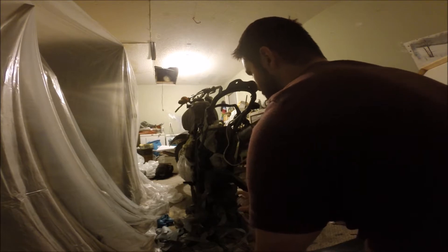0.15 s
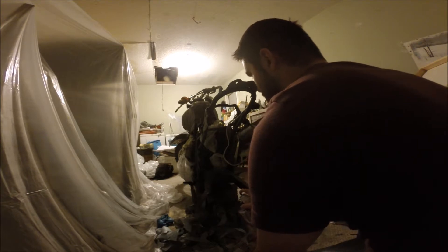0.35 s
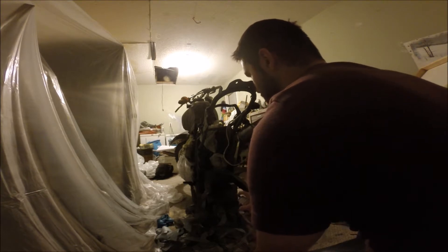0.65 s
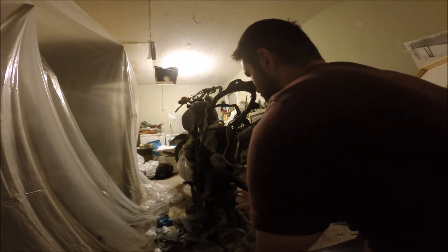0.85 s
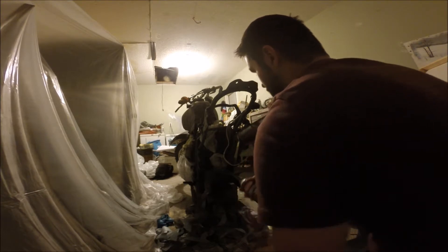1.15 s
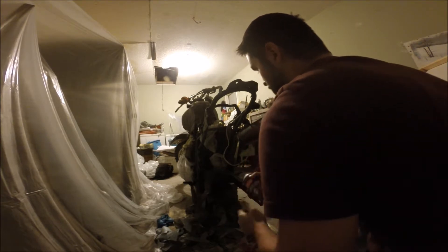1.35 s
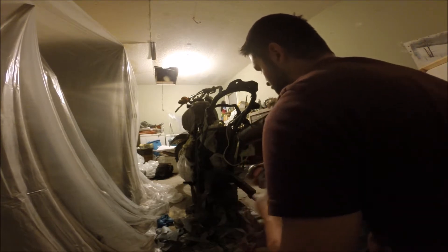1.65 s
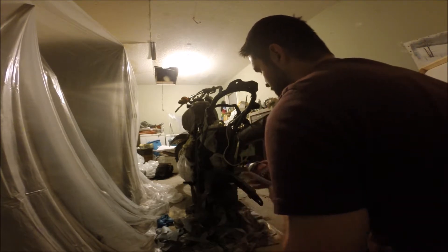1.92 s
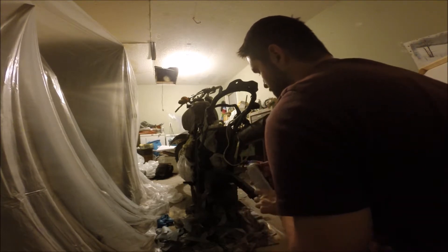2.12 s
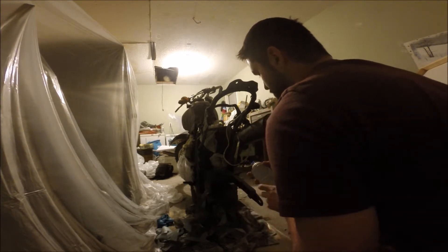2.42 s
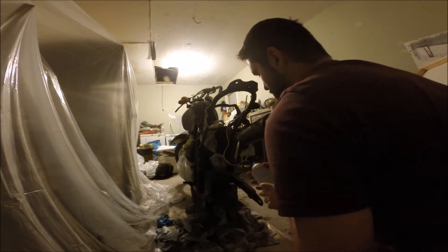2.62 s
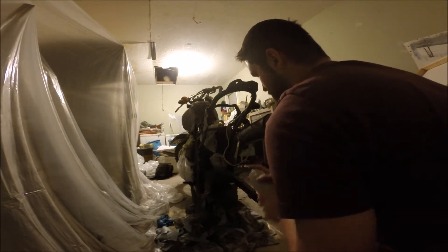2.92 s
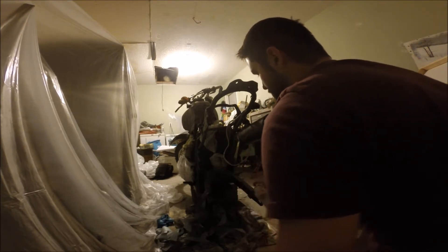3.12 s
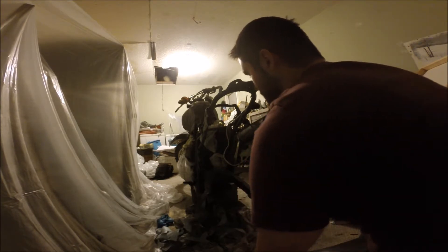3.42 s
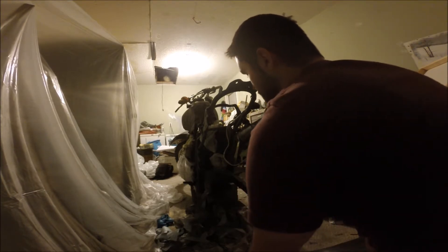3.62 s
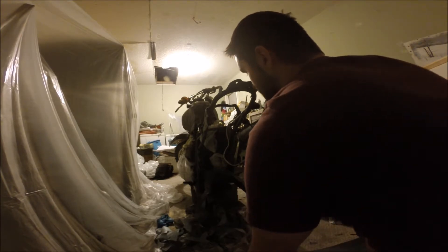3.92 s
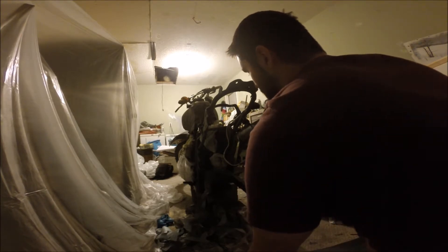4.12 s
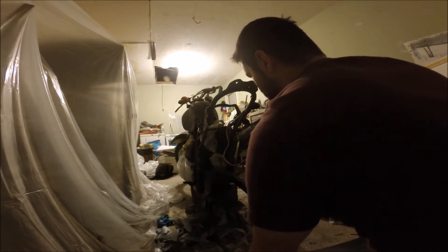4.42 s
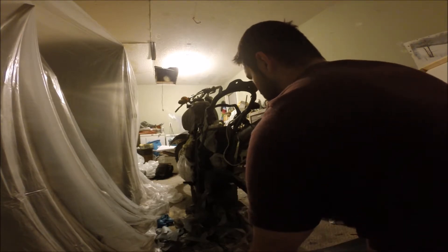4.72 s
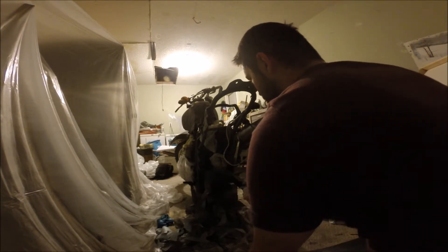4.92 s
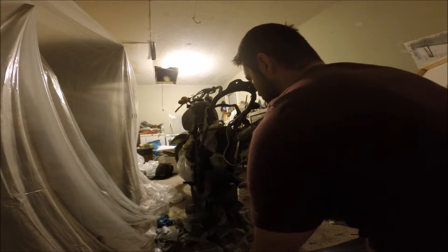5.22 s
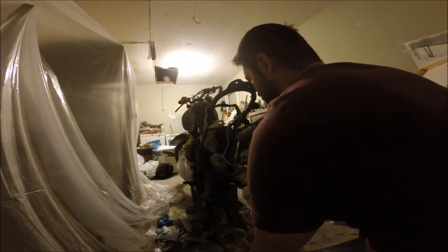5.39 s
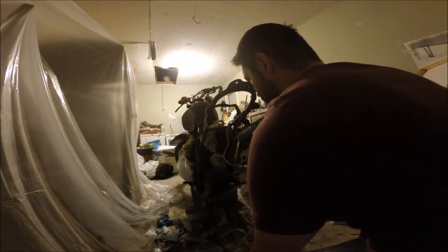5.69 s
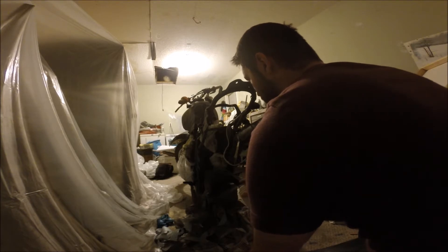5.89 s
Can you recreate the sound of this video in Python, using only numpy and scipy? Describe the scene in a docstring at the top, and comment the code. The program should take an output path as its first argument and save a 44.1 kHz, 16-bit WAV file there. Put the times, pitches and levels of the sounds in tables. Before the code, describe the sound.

Metallic ball rattle inside a shaken aerosol can, first a short burst, then a dense one, before two hissing sprays in a lightly echoing room.

```python
"""In a small workshop with bare walls, a can of spray paint is handled, shaken and sprayed.
Its mixing ball clacks a few times, then rattles hard; each blow is a click and a chatter that ring the can.
One dull bump, a soft push into low resonances, comes early in the shaking. The nozzle gives a short puff
and then a longer spray, both made of shaped noise, and the ball ticks on between them.
The walls echo briefly over a low rumble of noise and a faint mains hum, a plain sine tone."""
import sys
import numpy as np
from scipy import signal
from scipy.fft import rfft, irfft, next_fast_len
from scipy.io import wavfile

SR = 44100
rng = np.random.default_rng(int(sys.argv[2]) if len(sys.argv) > 2 else 0)


def digitize_waveform(pressure):
    """Quantize a signal to 16-bit integers and store it at the path in sys.argv[1].

    Rows of a 2-D input are taken as channels; values are limited to [-1, 1].
    """
    field = np.atleast_2d(pressure).T
    bounded = np.clip(field, -1, 1)
    quanta = np.round(bounded * 32767).astype(np.int16)
    wavfile.write(sys.argv[1], SR, quanta)


N = 266829
TIME = np.arange(N) / SR   # s
ECHO_SIZE = SR // 3   # samples in one echo or one blow
ROOM_EDGES = np.geomspace(100, SR / 2, 15)   # edges of the echo's bands, Hz
MAINS_HZ, FLOOR_DB = 60, -56   # pitch of the hum; level of the room noise
CUTOFF_HZ = 15600


def from_db(db):
    """Turn decibels into a gain."""
    return 10 ** (np.asarray(db) / 20)


def rms_one(x):
    """Scale a sound to an average power of 1."""
    return x / np.sqrt(np.mean(x ** 2) + 1e-20)


def at_hz(points, hz):
    """Read a table between its rows, with frequency on a log scale."""
    known_hz, values = np.transpose(points)
    return np.interp(np.log(np.maximum(hz, 1)), np.log(known_hz), values)


def noise(spectrum):
    """Steady noise: random values shaped by a spectrum, then scaled to rms 1."""
    size = next_fast_len(N)
    hz = np.arange(size // 2 + 1) * SR / size
    white = rfft(rng.standard_normal(size))
    coloured = irfft(white * from_db(at_hz(spectrum, hz)), size)
    return rms_one(coloured[:N])


def resonate(x, hz, width_hz):
    """One resonance: it favours one pitch, with gain 1 at its top, and a narrow one rings longer."""
    r = np.exp(-np.pi * width_hz / SR)
    top = np.array([1, 0, -1]) * (1 - r * r) / 2
    feedback = [1, -2 * r * np.cos(2 * np.pi * hz / SR), r * r]
    return signal.lfilter(top, feedback, x + 1e-18)


def add(track, s, sound):
    """Mix a short sound into a track at time s."""
    start = max(round(s * SR), 0)
    track[start:start + len(sound)] += sound[:N - start]


# Colour of the room's own noise: (frequency [Hz], relative level per Hz [dB])
ROOM_NOISE = [(12, -41), (20, -0.5), (123, -3.5), (255, -7.5), (367, -10), (459, -11), (542, -12),
              (1030, -17), (1370, -18), (1530, -19), (1710, -19), (4060, -25.5), (9140, -36),
              (14300, -45.5), (16000, -74)]


def background(hum_db):
    """The room's rumble and hiss are shaped noise; the faint mains hum is a sine."""
    hum = from_db(hum_db) * np.sin(2 * np.pi * MAINS_HZ * TIME)
    return from_db(FLOOR_DB) * noise(ROOM_NOISE) + hum


# Time the workshop's echo takes to fall by 60 dB: (frequency [Hz], time [s])
ECHO_TIMES = [(250, 0.19), (800, 0.6), (1800, 0.32), (4000, 0.32), (8000, 0.25), (14000, 0.29)]


def room_fades(build_s):
    """Echo loudness over time in each band: a quick build-up, then a decay, slowest near 800 Hz."""
    t = TIME[:ECHO_SIZE]
    band_middles = np.sqrt(ROOM_EDGES[:-1] * ROOM_EDGES[1:])
    t60 = at_hz(ECHO_TIMES, band_middles)
    fades = (1 - np.exp(-t / build_s)) * np.exp(-np.log(1000) * t / t60[:, None])
    return fades / np.linalg.norm(fades, axis=1, keepdims=True)


def echo(room, colour):
    """Many dense reflections act like noise of a given colour (dB for each Hz), fading band by band."""
    hz = np.arange(ECHO_SIZE // 2 + 1) * SR / ECHO_SIZE
    spectrum = rfft(rng.standard_normal(ECHO_SIZE)) * from_db(colour(hz))
    bands = (hz >= ROOM_EDGES[:-1, None]) & (hz < ROOM_EDGES[1:, None])
    return np.sum(irfft(spectrum * bands, ECHO_SIZE) * room, axis=0)


def workshop(x, room, echo_db):
    """The direct sound plus its echo, heard from one fixed spot."""
    return x + signal.fftconvolve(x, echo(room, lambda hz: echo_db))[:N]


def friction(swells, centre_hz, width_hz):
    """Rubbing makes many tiny grains: spiky noise through one broad resonance, in short swells."""
    out = np.zeros(N)
    for s, db, length in swells:
        swell = signal.windows.tukey(round(length * SR))
        grains = rng.standard_normal(len(swell)) ** 3   # cubing makes the noise spiky
        rub = rms_one(resonate(grains, centre_hz, width_hz))
        add(out, s, from_db(db) * swell * rub)
    return out


# Short soft rustles and faint scuffs: (time [s], level [dB], length [s])
RUSTLES = [(0.976, -60.5, 0.077), (1.496, -47, 0.016), (2.409, -64, 0.035), (3.00, -68.5, 0.27),
           (3.198, -45.5, 0.0205)]


def rustling():
    """Soft rustles and scuffs on the can, a short swell of friction each time."""
    return friction(RUSTLES, centre_hz=2100, width_hz=2100)


BUMP_S, BUMP_DB = 3.3473, 23.5   # time of the bump; strength of its push before filtering

# Low resonances of the hollow thing: (frequency [Hz], width [Hz], level [dB])
HOLLOW_TONES = [(274, 15, 4.5), (317, 41, 0.5), (535, 43, -6.5), (614, 37, -11)]


def bump(low_hz, soft_hz):
    """A padded knock against something hollow: a soft push into a few low resonances."""
    push = np.zeros(N)
    add(push, BUMP_S, from_db([BUMP_DB]))
    soften = signal.butter(3, [low_hz, soft_hz], "band", fs=SR, output="sos")
    push = signal.sosfilt(soften, push + 1e-18)
    return sum(from_db(db) * resonate(push, hz, width_hz) for hz, width_hz, db in HOLLOW_TONES)


def flutter(depth_db, per_s):
    """A gain that wanders at random, with per_s new targets each second."""
    knots = rng.standard_normal(1000)
    return from_db(depth_db * np.interp(TIME * per_s, np.arange(len(knots)), knots))


JET_FLOW_DB = -51.5   # flow at which the jet is as loud as the mist
JET_RANGE_DB = 10.5   # how gradually the jet takes over

# Flow of paint through the nozzle, one curve for each press: (time [s], level [dB])
PRESSES = [
    [(4.87, -67), (4.878, -59), (4.918, -49.5), (4.98, -50.5), (5.048, -56.5), (5.082, -50), (5.12, -76)],
    [(5.55, -68), (5.566, -55.5), (5.608, -50), (5.634, -56.5), (5.964, -57), (6.012, -46), (6.05, -47)],
]
# Colour of the mist's hiss: (frequency [Hz], relative level per Hz [dB])
MIST_COLOUR = [(400, -21), (800, -10), (1050, -6.5), (1250, 1), (1600, -7.5), (2500, -4.5), (3300, -3),
               (4800, -5), (6300, -11), (9000, -11.5), (10500, -14), (15000, -12), (16000, -35)]


def spray(mist_gain_db, jet_gain_db, jet_hz, jet_width_hz, valve_s):
    """The valve opens on a broad hiss of mist; a stronger flow brings out the rush of the jet."""
    mist = from_db(mist_gain_db) * noise(MIST_COLOUR)
    rush = resonate(rng.standard_normal(N), jet_hz, jet_width_hz)
    rush = resonate(rush, jet_hz, jet_width_hz)
    jet = from_db(jet_gain_db) * rms_one(rush)
    out = np.zeros(N)
    for press in PRESSES:
        s, db = np.transpose(press)
        flow_db = np.interp(TIME, s, db)
        valve = np.clip(np.minimum(TIME - s[0], s[-1] - TIME) / valve_s, 0, 1)
        jet_share = 1 / (0.5 + np.exp((JET_FLOW_DB - flow_db) / JET_RANGE_DB))
        blend = np.sqrt(1 - jet_share) * mist + np.sqrt(jet_share) * jet
        out += valve * from_db(flow_db) * blend
    return out


TICK_OVER_ROLL_DB, TICK_SPREAD_DB = 17, 2   # ticks against the roll's level; their random variation
TICK_SHARE_DB = [-6, -12, -15]   # shares of wall, base and rim in a tick
TICK_LOW_HZ, TICK_HIGH_HZ = 1400, 2500   # range of wall pitches that ticks wake

# The ball rolls around the wall between strikes: (time [s], level [dB], length [s])
BALL_ROLLS = [(1.70, -67, 0.31), (3.76, -53.5, 0.42), (4.549, -58, 0.36), (5.271, -64, 0.32)]


def rolling():
    """The ball rubs along the wall as it rolls, a swell of friction for each roll."""
    return friction(BALL_ROLLS, centre_hz=2010, width_hz=990)


def ticks(count=5):
    """The rolling ball taps the wall lightly at random moments; rows as for the strikes."""
    rows = []
    for s, db, length in BALL_ROLLS:
        for k, (when, where) in enumerate(rng.random((count, 2))):
            tick_s = s + length * (k + when) / count   # one in each equal part of the roll
            level_db = db + TICK_OVER_ROLL_DB + TICK_SPREAD_DB * rng.standard_normal()
            wall_hz = TICK_LOW_HZ + where * (TICK_HIGH_HZ - TICK_LOW_HZ)
            rows.append((tick_s, level_db, wall_hz, *TICK_SHARE_DB))
    return rows


CRACK_S, CRACK_HZ = 0.0039, 6430   # fading time of the crack; above this pitch the click is all crack
CRACK_SHARE = 0.35   # part of the click's lower power that breaks up
CRACK_PER_LEAN_DB = 0.1   # change of that part per dB of lean: a square blow on the base is cleaner
SKID_S = 0.0059   # fading time of the chatter


def contact(skid_db, lean_db, skid_build_s=0.0015):
    """Force of one blow: a click that breaks up into a crack, then chatter as the ball skids."""
    t = TIME[:ECHO_SIZE]
    crack = rng.standard_normal(len(t)) * np.exp(-t / CRACK_S)
    crack = crack / np.linalg.norm(crack)
    chatter = rng.standard_normal(len(t)) ** 3 * np.exp(-t / SKID_S) * (1 - np.exp(-t / skid_build_s))
    chatter = chatter / np.linalg.norm(chatter)
    broken = np.clip(CRACK_SHARE + CRACK_PER_LEAN_DB * lean_db, 0, 1)
    click = np.sqrt(1 - broken) * (t == 0) + np.sqrt(broken) * crack
    lows = signal.lfilter(*signal.butter(2, CRACK_HZ, fs=SR), click + 1e-18)
    highs = signal.lfilter(*signal.butter(2, CRACK_HZ, "high", fs=SR), crack + 1e-18)
    return lows - highs + from_db(skid_db) * chatter


BASE_HZ, SHOULDER_HZ, RIM_HZ = [3538, 3960], [5170, 6300], 9100   # tones of the can's parts
WALL_OCTAVES = 0.54   # reach of a wall tone to either side
WALL_FOCUS_DB = 7.5   # the struck wall tone stands this far over its neighbours
BASE_DB, RIM_DB = -3.5, -10.5   # answer of base and rim against the wall
SHOULDER_DB = 0.4   # answer of the shoulder against the mean of base and rim


def shares(hz, wall_hz, wall_db, base_db, rim_db):
    """How strongly one blow drives each pitch, in dB; the shoulder lies between base and rim."""
    reach = 2 ** WALL_OCTAVES
    above_hz = min(wall_hz * reach, BASE_HZ[0])
    anchors = np.sort([wall_hz / reach, wall_hz, above_hz, *BASE_HZ, *SHOULDER_HZ, RIM_HZ])
    beside_db = wall_db - WALL_FOCUS_DB
    base_db, rim_db = base_db + BASE_DB, rim_db + RIM_DB
    shoulder_db = (base_db + rim_db) / 2 + SHOULDER_DB
    above_db = (beside_db + base_db) / 2
    levels = [beside_db, wall_db, above_db, base_db, base_db, shoulder_db, shoulder_db, rim_db]
    return np.interp(np.log(np.maximum(hz, 1)), np.log(anchors), levels)


WALL_TONE_WIDTH_HZ, WALL_TONE_DB = 30, 2.5   # the struck patch of wall rings at its own pitch

# Resonances of the can, damped by paint and hand: (frequency [Hz], width [Hz], level [dB])
CAN_TONES = [(870, 290, 2.5), (1370, 210, 6), (1560, 195, 5.5), (1720, 107, 10.5), (2190, 440, 0),
             (2646, 206, 6), (3520, 134, 7), (4215, 220, 7.5), (5200, 640, 5), (5690, 1080, 3),
             (6740, 690, 0.5), (8510, 700, 1.5), (10650, 3100, -6.5), (14100, 1800, -17)]
# Thin metallic rings that outlast the clack: (frequency [Hz], width [Hz], level [dB])
METAL_RINGS = [(2600, 18, -11), (4040, 5.6, 12), (4215, 14, 10)]


def clack(force, spot, spread_db):
    """The can's resonances and the struck patch of wall ring when the force hits them."""
    hz, width_hz, mode_db = np.transpose(CAN_TONES + METAL_RINGS)
    wall_hz, wall_db = spot[:2]
    gains = from_db(mode_db + shares(hz, *spot) + spread_db * rng.standard_normal(len(hz)))
    out = from_db(wall_db + WALL_TONE_DB) * resonate(force, wall_hz, WALL_TONE_WIDTH_HZ)
    for k, gain in enumerate(gains):
        out += (-1) ** k * gain * resonate(force, hz[k], width_hz[k])   # signs alternate
    return out


ECHO_CONTRAST = 0.63   # the part that is hit speaks first; the rest of the shell joins in the echo

# What the whole can sends into the room in all directions: (frequency [Hz], level [dB])
CAN_RADIATION = [(150, -6), (450, -5), (1100, 0.5), (1400, 4.5), (1750, 7.5), (2100, 4.5), (2550, 4),
                 (3150, -3.5), (3550, 0.5), (4200, 0), (6300, -2.5), (7700, -7), (9500, -3), (12300, -14),
                 (14500, -16)]


def can_echo(room, spot, ripple):
    """The room answers the sound of the whole can, which favours the part that was hit less."""
    _, wall_db, base_db, _ = spot
    mean_db = (wall_db + base_db) / 2

    def colour(hz):
        evened = ECHO_CONTRAST * shares(hz, *spot) + (1 - ECHO_CONTRAST) * mean_db
        return at_hz(CAN_RADIATION, hz) + evened + ripple(hz)

    return echo(room, colour)


OVERTONE_GAP_HZ = 45   # spacing of the shell's lesser modes
SKID_DB, SKID_PER_LEAN = -7, 0.17   # chatter of an even blow; its growth per dB of lean to the wall

# The ball hits the can; the spot it meets shares the blow between side wall, domed base and stiff rim:
# (time [s], level [dB], pitch of the struck wall [Hz], wall share [dB], base share [dB], rim share [dB])
BALL_STRIKES = [(1.3745, -23, 2520, -14, -14, -17.5), (1.3884, -28.5, 1740, -12, -11, -14),
                (1.5293, -26.5, 2210, -11, -14, -10), (1.5555, -27.5, 1790, -9.5, -14.5, -16),
                (1.5797, -28, 2260, -15.5, -11, -12.5), (1.666, -23.5, 1560, -8, -17, -19.5),
                (1.7398, -31.5, 1810, -19, -10, -17.5), (1.7907, -33, 1780, -16.5, -11.5, -24),
                (3.219, -23.5, 2590, -14.5, -10.5, -10), (3.2693, -19, 1900, -18.5, -14.5, -10.5),
                (3.3678, -20.5, 1830, -6.5, -21, -21), (3.3788, -23.5, 1720, -13, -14, -16.5),
                (3.4243, -21.5, 1600, -16, -11.5, -12.5), (3.5199, -21.5, 1980, -10.5, -12.5, -16),
                (3.5313, -23.5, 1720, -11.5, -14.5, -21), (3.5577, -22, 1490, -28, -9.5, -21),
                (3.6507, -19.5, 1630, -6, -17.5, -15.5), (3.694, -22.5, 2650, -11.5, -12.5, -11.5),
                (3.7334, -21.5, 1600, -8.5, -18, -22), (3.7744, -17.5, 1366, -7, -14.5, -27),
                (3.7956, -24, 1260, -14, -21, -19), (3.8544, -20, 1170, -15.5, -12, -11.5),
                (3.8792, -25, 1390, -9.5, -13.5, -17), (3.904, -22.5, 1290, -7, -15, -23),
                (3.9666, -21, 1830, -11, -11.5, -16.5), (3.9855, -24, 1720, -10.5, -10.5, -16),
                (4.0497, -20.5, 2590, -14, -13.5, -16), (4.117, -15, 1720, -18, -10, -16),
                (4.2676, -9, 2570, -21.5, -13.5, -20.5), (4.4269, -12.5, 1380, -21.5, -14.5, -20),
                (4.5652, -36.5, 1720, -8.5, -16.5, -18), (4.59, -35, 1400, -7, -21, -26),
                (4.6547, -32.5, 2080, -14, -11, -21), (4.7405, -33, 2230, -12.5, -13.5, -13.5),
                (5.1357, -28.5, 1440, -10, -14.5, -16), (5.2565, -28.5, 2510, -12.5, -12.5, -13),
                (5.2994, -36, 1580, -9, -28, -24), (5.3302, -36.5, 1640, -22, -9, -20)]


def rattle(room, direct_db, echo_db, spread_db, ripple_db, reflection_s, reflection_db):
    """Every blow drives all modes of the can; the can moves, so each meets a new pattern of echoes."""
    overtone_hz = np.arange(0, SR / 2, OVERTONE_GAP_HZ)
    overtone_db = ripple_db * rng.uniform(-1.12, 1, len(overtone_hz))
    ripple = lambda hz: np.interp(hz, overtone_hz, overtone_db)
    out = np.zeros(N)
    for s, level_db, *spot in list(BALL_STRIKES) + ticks():
        _, wall_db, base_db, _ = spot
        lean_db = wall_db - base_db   # above 0 a glancing blow on the wall, below 0 a square one on the base
        skid_db = SKID_DB + SKID_PER_LEAN * lean_db
        direct = clack(contact(skid_db, lean_db), spot, spread_db)
        direct *= from_db(direct_db + level_db)
        add(out, s, direct)
        add(out, s + reflection_s, from_db(reflection_db) * direct)
        strength = from_db(echo_db + level_db) * np.hypot(1, from_db(skid_db))   # blow and skid add in power
        add(out, s, strength * can_echo(room, spot, ripple))
    return out


def scene():
    """Ball, rustles and nozzle sound through the room, over its background."""
    room = room_fades(build_s=0.00057)
    floor = background(hum_db=-65.5)
    rustle = rustling()
    knock = workshop(bump(low_hz=217, soft_hz=660), room, echo_db=-8)
    paint = spray(mist_gain_db=2.5, jet_gain_db=-0.5, jet_hz=4800, jet_width_hz=4600, valve_s=0.0095)
    paint = paint * flutter(depth_db=0.2, per_s=25)   # the flow sputters a little
    soft_sounds = workshop(rolling() + rustle + paint, room, echo_db=-3)
    ball = rattle(room, direct_db=32.5, echo_db=31.0, spread_db=2.5, ripple_db=6.0,
                  reflection_s=0.012, reflection_db=-11.5)
    return (ball + knock + soft_sounds + floor)[None]


def record(dry):
    """A steep low-pass filter removes the very top of the treble."""
    low_pass = signal.ellip(10, .1, 70, CUTOFF_HZ, fs=SR, output="sos")
    return signal.sosfilt(low_pass, dry)


dry = scene()
out = record(dry)
digitize_waveform(out)
```